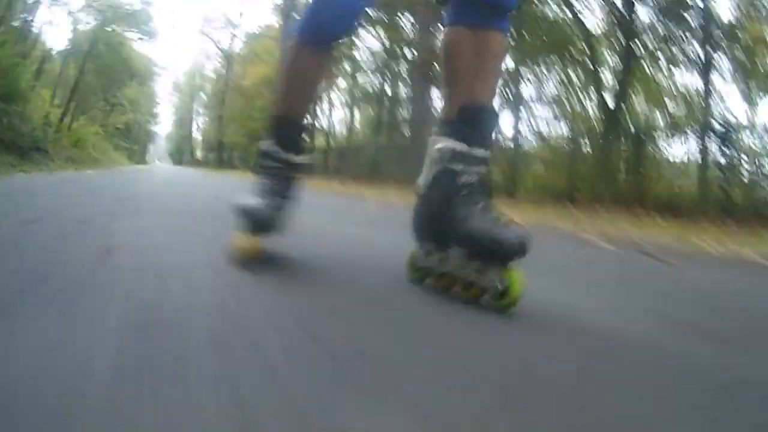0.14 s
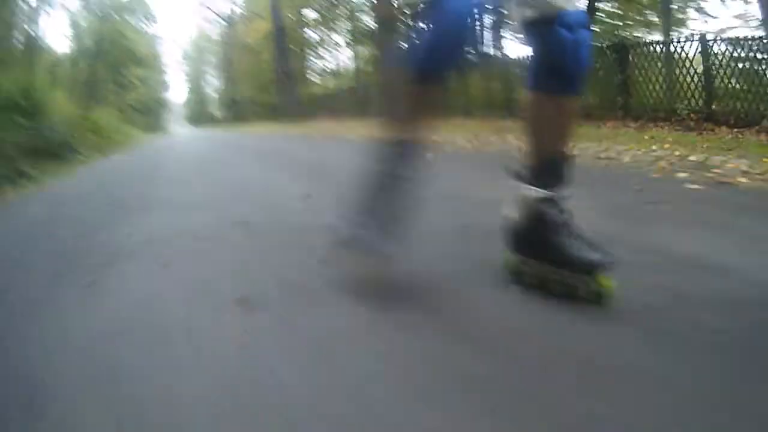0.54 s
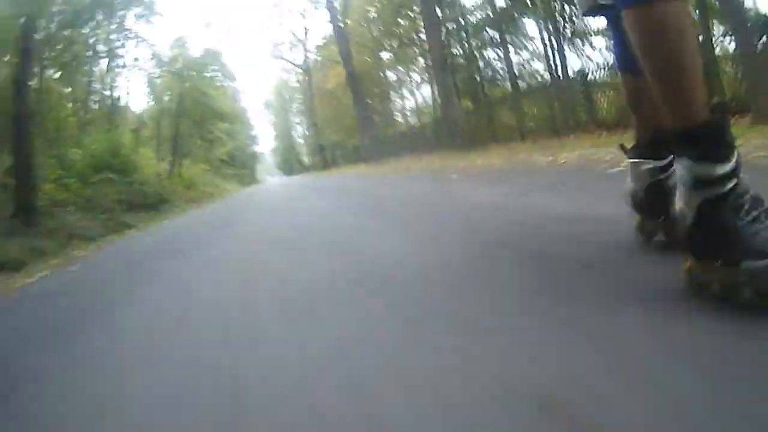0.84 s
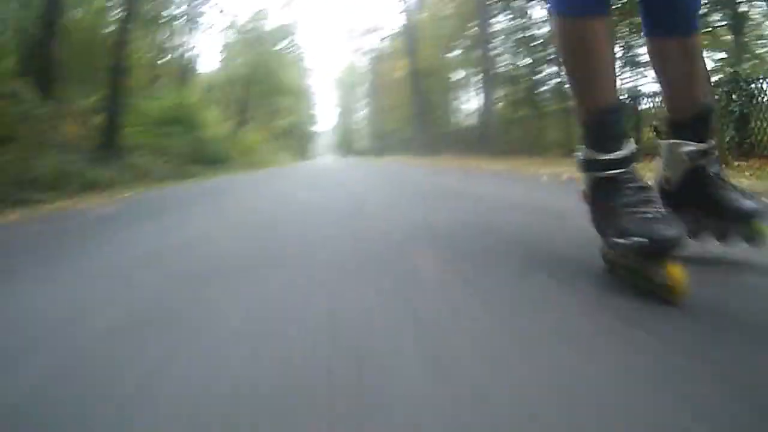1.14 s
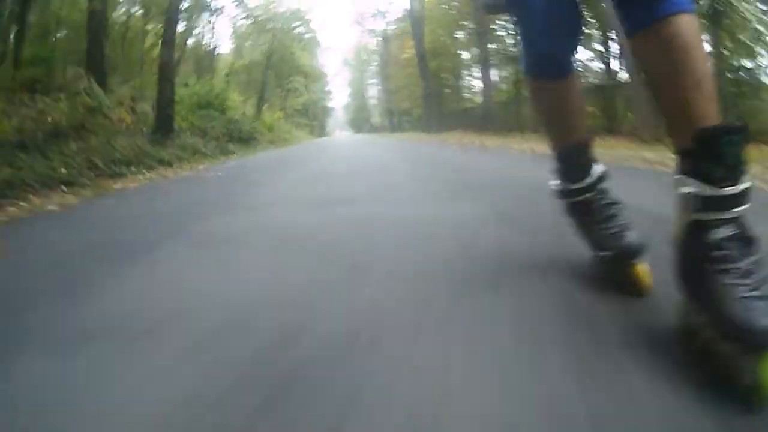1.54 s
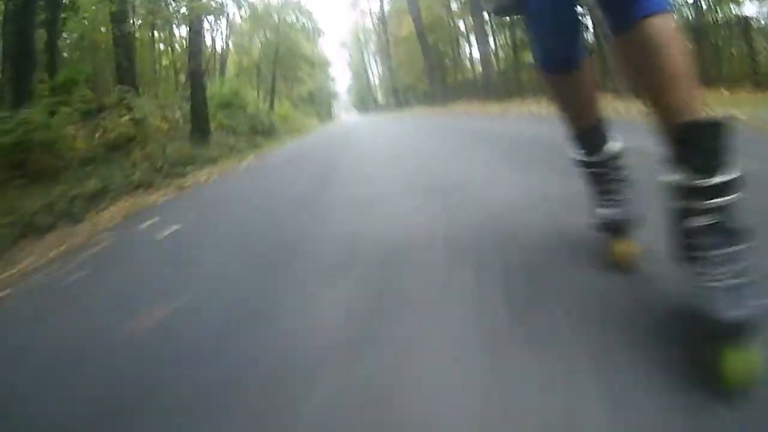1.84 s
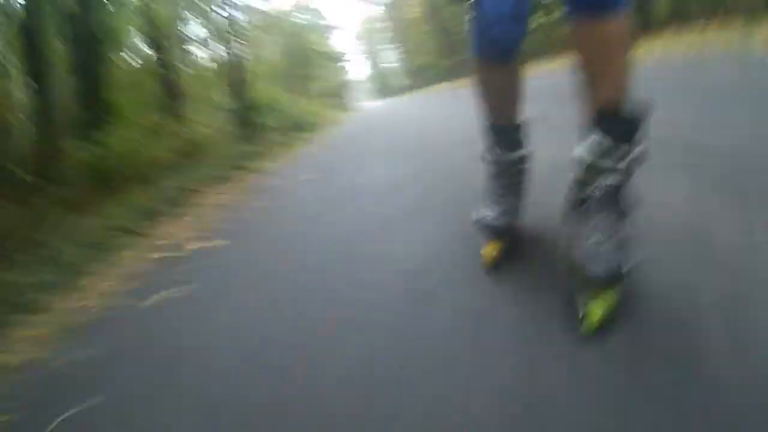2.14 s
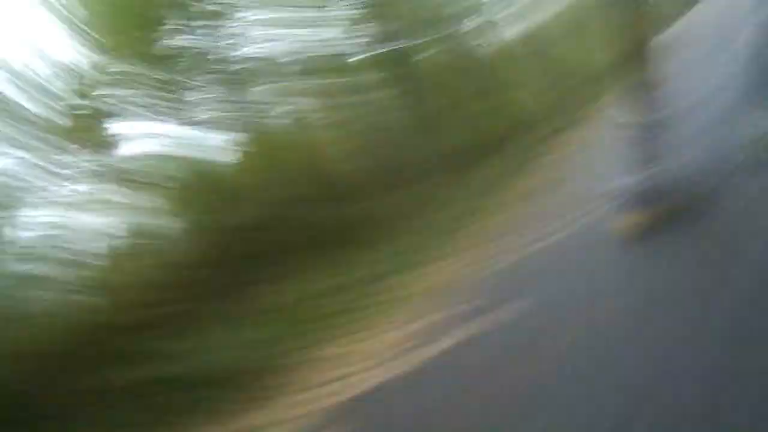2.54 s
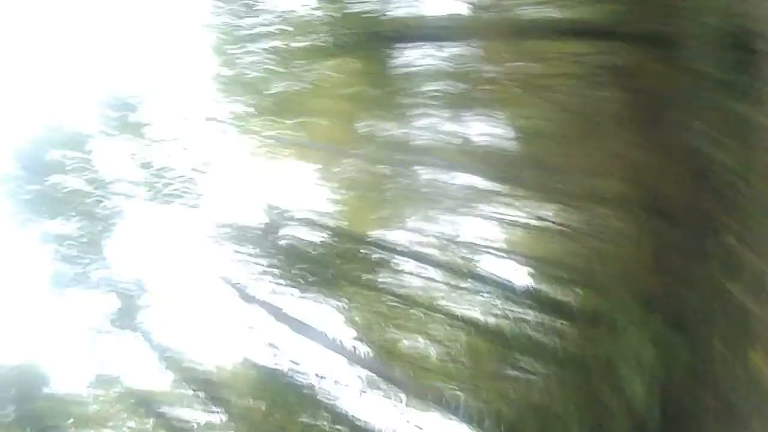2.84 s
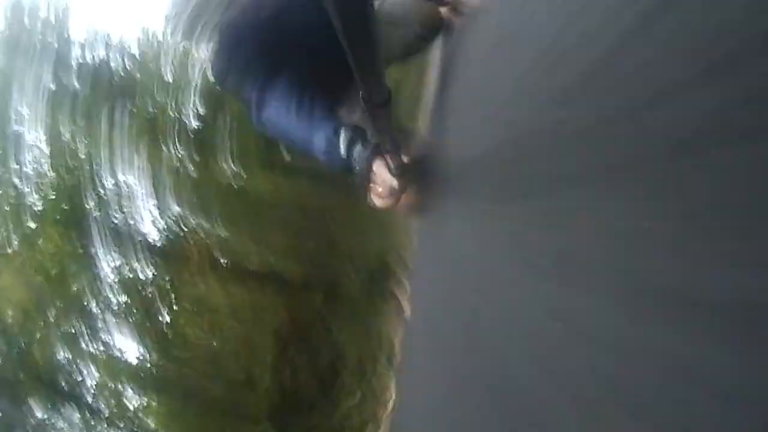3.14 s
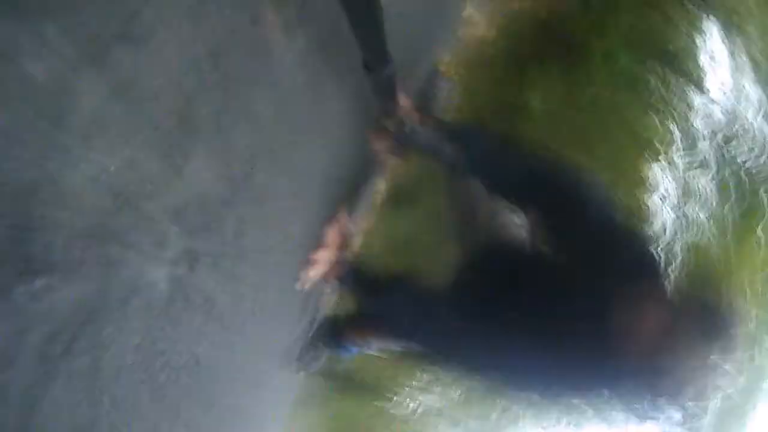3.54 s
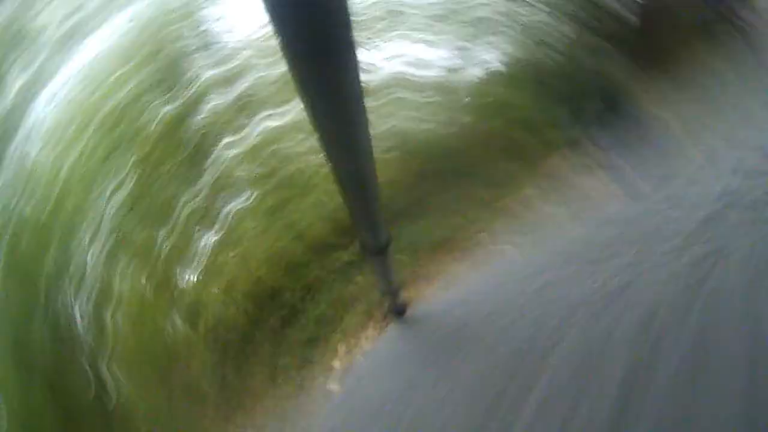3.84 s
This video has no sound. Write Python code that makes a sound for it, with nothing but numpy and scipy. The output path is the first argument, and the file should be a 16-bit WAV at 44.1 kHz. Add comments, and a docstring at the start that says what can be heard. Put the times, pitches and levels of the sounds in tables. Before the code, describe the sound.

Inline skates roll quietly on an asphalt path, heard dully inside a camera housing on a pole, with low shudder and few ticks; around 3.5 seconds the camera hits the ground with loud thuds and judder.

```python
"""Inline skates and a falling camera

Wheels roll over asphalt, heard dully through a closed camera housing on a pole: shaped noise.
The pole shudders as low noise and rings as decaying sines; contacts excite the housing's modes.
Now and then the housing knocks and ticks. At the end the camera swings down and hits the ground:
it knocks, judders in a quick run of slips, scrapes and knocks again. Steady hiss lies under it all."""
import sys
import numpy as np
from scipy import signal
from scipy.fft import rfft, irfft, next_fast_len
from scipy.io import wavfile
from scipy.ndimage import map_coordinates

SR = 44100
rng = np.random.default_rng(int(sys.argv[2]) if len(sys.argv) > 2 else 0)


def master(y):
    """Save y as 16-bit WAV."""
    cut = np.clip(np.atleast_2d(y).T, -1, 1)
    pcm = np.round(cut * 32767)  # scale
    wavfile.write(sys.argv[1], SR, pcm.astype(np.int16))


N = 176400


def amp(db):
    """Logarithmic level: decibels to amplitude gain."""
    return 10 ** (np.asarray(db) / 20)


def unit(x):
    """Power normalization: scale to rms 1."""
    return x / np.sqrt(np.mean(x ** 2) + 1e-20)


def along(points, hz):
    """Logarithmic frequency scale: interpolate (frequency, value) points along it."""
    point_hz, values = np.transpose(points)
    return np.interp(np.log(hz + 1), np.log(point_hz + 1), values)


def curves(rows):
    """Piecewise-linear envelopes: one value per sample for each column after the time."""
    times, *columns = np.transpose(rows)
    return [np.interp(np.arange(N) / SR, times, column) for column in columns]


def wobble(rate):
    """Random modulation: a smooth curve through random knots, rate of them a second."""
    knots = rng.standard_normal(N // 8)
    return map_coordinates(knots, [np.arange(N) * rate / SR], mode="wrap")


def filtered(x, response):
    """Linear filtering: multiply the spectrum of x by a response of frequency."""
    size = next_fast_len(N + SR // 2)
    hz = np.fft.rfftfreq(size, 1 / SR)
    return irfft(rfft(x, size) * response(hz), size)[:N]


def noise(spectrum):
    """Spectral shaping: white noise coloured by a spectrum, at rms 1."""
    white = rng.standard_normal(N)
    return unit(filtered(white, lambda hz: amp(along(spectrum, hz))))


def add(out, s, x):
    """Superposition: mix x into out from time s."""
    part = out[max(round(s * SR), 0):][:len(x)]
    part += x[:len(part)]


# Loudness of the rolling wheels, before its flutter: (time [s], level [dB])
ROLL_LEVEL = [(0, -66), (.2, -68), (.42, -68), (.62, -64), (.8, -64), (1.0, -65.5), (1.17, -64),
              (1.3, -65.5), (1.42, -67), (1.65, -69), (1.95, -64), (2.15, -66.5), (2.33, -63.5),
              (2.6, -63.5), (2.9, -66.5), (3.1, -65.5), (3.4, -62.5), (4, -57)]
# Spectrum of the wheels through the housing: (frequency [Hz], relative density [dB per Hz])
WHEEL_SPECTRUM = [(100, -13.5), (200, -0.5), (350, -6), (540, -3), (800, -7), (1000, -1.5), (1130, 1.5),
                  (1400, -6.5), (1600, -12), (1850, -14.5), (2200, -22), (2650, -21), (2850, -11.5),
                  (3050, -15.5), (3300, -26), (3700, -19.5), (4700, -28), (8000, -38)]


def wheels():
    """Rolling noise: wheels roar on the grain of the asphalt, swelling with each stride."""
    level_db, = curves(ROLL_LEVEL)
    flutter_db = 0.58 * wobble(12) + 0.9 * wobble(90)
    return amp(level_db + flutter_db) * noise(WHEEL_SPECTRUM)


# Shudder of the pole in the air stream, before its flutter: (time [s], level [dB])
SHUDDER_LEVEL = [(0, -51.5), (.17, -56), (.35, -51.5), (.8, -51.5), (1.1, -55), (1.5, -54), (1.8, -52.5),
                 (2.2, -54), (2.7, -56), (3.0, -53.5), (3.41, -57), (3.46, -48), (3.52, -38.5), (3.62, -29),
                 (3.7, -33), (3.8, -31.5), (4, -33)]
# Spectrum of the shudder: (frequency [Hz], relative density [dB per Hz])
SHUDDER_SPECTRUM = [(10, -2), (25, -4), (42, 1.5), (60, -7), (85, -16), (115, -17.5), (170, -28.5),
                    (300, -42), (800, -81.5)]
# Jolts that ring the pole: (time [s], level before the attack [dB], pitch [Hz], 60 dB decay time [s])
POLE_JOLTS = [(3.511, -27, 101, .07), (3.579, -18.5, 112, 0.052), (3.635, -14.5, 41.3, 0.055),
              (3.743, -34, 42.5, .15), (3.771, -36, 99, 0.13), (3.818, -9, 37.2, 0.11),
              (3.907, -20, 36.1, 0.69), (3.935, -35.5, 104, 0.2)]
JOLT_ATTACK_S = 0.0034


def pole():
    """Forced and free vibration: the pole shudders all the time and rings as a damped sine at each jolt."""
    level_db, = curves(SHUDDER_LEVEL)
    out = amp(level_db + 2.7 * wobble(17)) * noise(SHUDDER_SPECTRUM)
    t = np.arange(SR // 2) / SR
    attack = 1 - np.exp(-t / JOLT_ATTACK_S)
    for s, db, hz, t60 in POLE_JOLTS:
        decay = amp(db - 60 * t / t60)
        add(out, s, -decay * np.sin(2 * np.pi * hz * t) * attack)
    return out


# Broad response of the housing to a contact: (frequency [Hz], relative level [dB])
HOUSING_RESPONSE = [(30, -28), (120, -0.5), (230, 0.5), (400, 2), (660, -5), (1200, -3.5), (1700, -14),
                    (2300, -15), (2950, -13.5), (3400, -23), (4150, -22.5), (5000, -42), (6000, -48),
                    (8200, -45), (10000, -65), (15000, -63)]
# Resonances of the housing: (frequency [Hz], width [Hz], lift above the broad response [dB])
HOUSING_MODES = [(233, 50, 3.5), (529, 115, 6), (765, 31, 12.5), (1095, 110, 8.5), (1187, 150, 3),
                 (1352, 23, 2.5), (1646, 48, 10.5), (1850, 89, 9), (2470, 45, 4.5), (2826, 69, 0),
                 (2960, 80, 5), (3743, 117, 11.5)]
BEND_DELAY_S = 0.001156  # travel time of a bending wave at 1 kHz; higher ones arrive sooner


def housing(bright_hz, size=8192):
    """Modal response and bending dispersion: a short chirping ring of peak 1, duller above bright_hz."""
    hz = np.fft.rfftfreq(size, 1 / SR)
    db = along(HOUSING_RESPONSE, hz)
    for mode_hz, width, lift in HOUSING_MODES:
        db = db + lift / (1 + (2 * (hz - mode_hz) / width) ** 2)
    contact_softness = np.hypot(1, (hz / bright_hz) ** 2)
    # Folding the cepstrum gives minimum phase: the ring starts at once.
    cepstrum = irfft(np.log(amp(db) / contact_softness))
    cepstrum[1:size // 2] *= 2
    cepstrum[size // 2 + 1:] = 0
    # The phase lag of bending waves makes their delay fall as one over the root of frequency.
    travel = 4 * np.pi * BEND_DELAY_S * np.sqrt(1000 * hz)
    ring = irfft(np.exp(rfft(cepstrum) - 1j * travel))[:size // 2]
    return ring / np.abs(ring).max()


# Blows on the housing: (time [s], peak [dB], brightness [Hz])
HOUSING_KNOCKS = [(0.0753, -51.5, 2000), (.0795, -43, 4000), (.092, -54, 3000), (.409, -57, 1490),
                  (.477, -52, 5000), (.638, -53.5, 3000), (1.4201, -47.5, 2000), (1.481, -53.5, 1590),
                  (1.570, -49.5, 4000), (1.583, -54, 3000), (3.533, -35, 800), (3.571, -32.5, 1010),
                  (3.580, -18, 1100), (3.582, -24, 1270), (3.6049, -20.5, 9000), (3.6365, -31, 6960),
                  (3.745, -35, 3930), (3.7759, -39.5, 800), (3.8175, -32.5, 5000), (3.8225, -30.5, 2500),
                  (3.8245, -28, 1030), (3.855, -44, 4000), (3.902, -50, 5000), (3.928, -39, 1800),
                  (3.9691, -40.5, 900), (3.976, -39.5, 800)]


def knocks():
    """Impulse response: each blow rings the housing, dulled above its own brightness."""
    out = np.zeros(N)
    for s, db, bright_hz in HOUSING_KNOCKS:
        add(out, s, amp(db) * housing(bright_hz))
    return out


# Sharp plastic ticks: (time [s], peak [dB], low edge [Hz], high edge [Hz], ring gain over crack [dB])
PLASTIC_TICKS = [(.076, -55, 1490, 4000, -2), (.080, -45.5, 990, 5940, -6), (0.091, -55.5, 1480, 4000, -12),
                 (1.4198, -42.5, 1300, 2200, 13), (1.4212, -39, 4330, 6100, -1.5),
                 (1.4245, -53, 3040, 6000, -3), (1.57, -54.5, 1500, 5500, -19),
                 (3.581, -48.5, 1500, 3500, -15), (3.623, -50.5, 3800, 8000, -9),
                 (3.630, -56, 6600, 9000, -6), (3.7062, -43.5, 1500, 6440, -7),
                 (3.725, -43.5, 3760, 4700, 8), (3.8145, -58, 3000, 6540, -9),
                 (3.823, -54, 2000, 6000, -18), (3.938, -56, 4000, 8000, -10)]
# Modes that a tick rings: (frequency [Hz], relative level [dB], 60 dB decay time [s])
PLASTIC_MODES = [(1900, -2, 0.015), (3790, -8.5, 0.013), (4770, 1.5, 0.004), (5520, -8, 0.0093),
                 (6210, -15, 0.0082), (7600, -18, 0.0054)]
CRACK_T60_S = 0.0068
TICK_TOP_HZ = 8600  # the housing muffles every tick above this


def ticks():
    """Modal synthesis: tiny cracks of plastic, as noise bursts, ring a few high modes for milliseconds."""
    out, t = np.zeros(N), np.arange(SR // 20) / SR
    for s, db, low_hz, high_hz, ring_db in PLASTIC_TICKS:
        ring = np.zeros(len(t))
        for hz, level, t60 in PLASTIC_MODES:
            ring += amp(level - 60 * t / t60) * np.sin(2 * np.pi * (hz * t + rng.random()))
        crack = amp(-60 * t / CRACK_T60_S) * rng.standard_normal(len(t))
        tick = amp(ring_db) * ring + crack
        for edge, kind in (low_hz, "high"), (high_hz, "low"), (TICK_TOP_HZ, "low"):
            tick = signal.lfilter(*signal.butter(2, edge, kind, fs=SR), tick)
        add(out, s, amp(db) * tick / np.abs(tick).max())
    return out


# Scrapes: (start [s], time until release [s], level [dB], brightness [Hz])
SLIDES = [(3.509, 0.082, -55.5, 1520), (3.64, 0.022, -59, 2470), (3.74, 0.022, -44.5, 6000),
          (3.815, 0.011, -42, 7000), (3.9, 0.0096, -44, 6000), (3.915, 0.014, -49, 3000),
          (3.942, 0.0065, -47.5, 4000), (3.951, 0.014, -46, 6900), (3.98, .03, -56, 4000)]
SCRAPE_ATTACK_S, SCRAPE_RELEASE_S = 0.0022, 0.0027
# Treble of the last slide, before its flutter: (time [s], level [dB])
FIZZ_LEVEL = [(3.86, -84), (3.885, -76), (3.908, -64.5), (3.928, -75), (3.955, -71.5), (4, -75)]
# Spectrum of that treble: (frequency [Hz], relative density [dB per Hz])
FIZZ_SPECTRUM = [(1500, -14), (4400, 2), (5400, 7.5), (6500, -5), (8500, -6), (10000, -20), (15000, -35)]


def scrapes(grains_per_s=1500, thin_hz=650):
    """Sliding friction: dense little catches ring the housing, thinned in the bass; the end also fizzes."""
    out, t = np.zeros(N), np.arange(SR // 5) / SR
    for s, length, db, bright_hz in SLIDES:
        catches = rng.random(len(t)) < grains_per_s / SR
        grains = rng.standard_normal(len(t)) * catches
        attack = np.minimum(t / SCRAPE_ATTACK_S, 1)
        release = np.exp(-np.maximum(t - length, 0) / SCRAPE_RELEASE_S)
        stroke = attack * release
        ring = signal.lfilter(*signal.butter(1, thin_hz, "high", fs=SR), housing(bright_hz))
        ring = ring / np.linalg.norm(ring)
        add(out, s, amp(db) * signal.fftconvolve(unit(grains) * stroke, ring))
    fizz_db, = curves(FIZZ_LEVEL)
    sliding = np.arange(N) / SR > FIZZ_LEVEL[0][0]
    return out + sliding * amp(fizz_db + 2.3 * wobble(430)) * noise(FIZZ_SPECTRUM)


# Judder after the first hard blow: (time [s], slip rate [1/s], peak before scatter [dB])
SLIP_RUN = [(3.586, 270, -30), (3.594, 285, -23.5), (3.602, 290, -23), (3.607, 500, -25.5),
            (3.615, 520, -22.5), (3.622, 502, -30.5), (3.626, 450, -44)]


def judder(bright_hz=6500):
    """Stick-slip friction: the housing rings at each slip; the slip rate jumps up, then eases."""
    scatter_s, scatter_db = .0001, 1.8
    rate, level_db = curves(SLIP_RUN)
    first, last = round(SLIP_RUN[0][0] * SR), round(SLIP_RUN[-1][0] * SR)
    # A slip falls wherever the running count of cycles passes a whole number.
    cycles = np.floor(np.cumsum(rate[first:last]) / SR)
    slips = first + np.flatnonzero(np.diff(cycles, prepend=-1))
    out, ring = np.zeros(N), housing(bright_hz)
    for i, (late, strong) in zip(slips, rng.standard_normal((len(slips), 2))):
        add(out, i / SR + scatter_s * late, amp(level_db[i] + scatter_db * strong) * ring)
    return out


def scene():
    """Superposition: every sound adds at one microphone inside the housing."""
    return (wheels() + pole() + knocks() + ticks() + scrapes() + judder())[None]


# Spectrum of the microphone noise: (frequency [Hz], relative density [dB per Hz])
HISS_SPECTRUM = [(100, 13), (3000, -2), (7000, -0.5), (10000, -1), (14000, -1.5), (15500, -11)]
HISS_DB, TOP_HZ, FADE_S = -77.5, 15600, .006


def record(dry):
    """Self-noise and band limiting: hiss joins the scene, whose end fades, and a steep low-pass follows."""
    band_limit = signal.ellip(12, .1, 80, TOP_HZ, fs=SR, output="sos")
    fade = np.minimum(np.arange(N)[::-1] / SR / FADE_S, 1)
    hiss = amp(HISS_DB) * noise(HISS_SPECTRUM)
    return signal.sosfilt(band_limit, fade * dry + hiss)


dry = scene()
out = record(dry)
master(out)
```